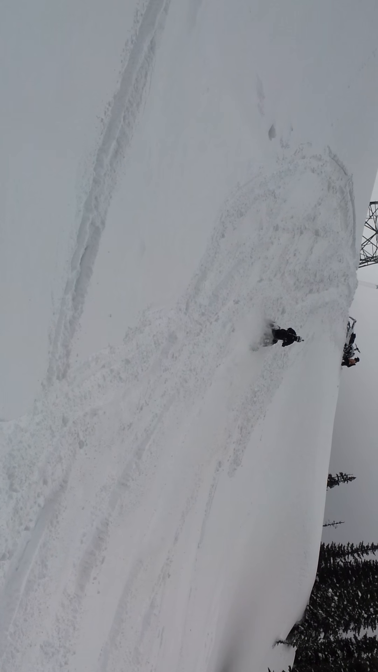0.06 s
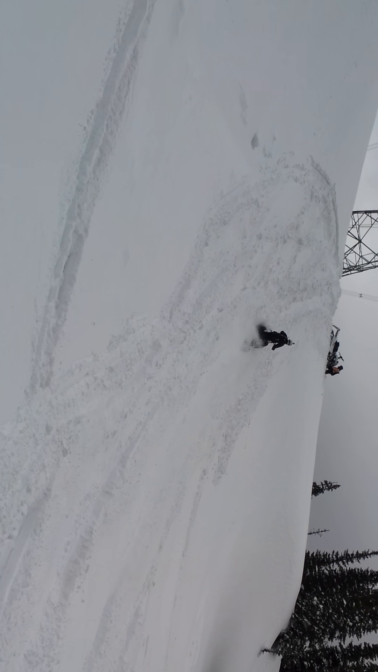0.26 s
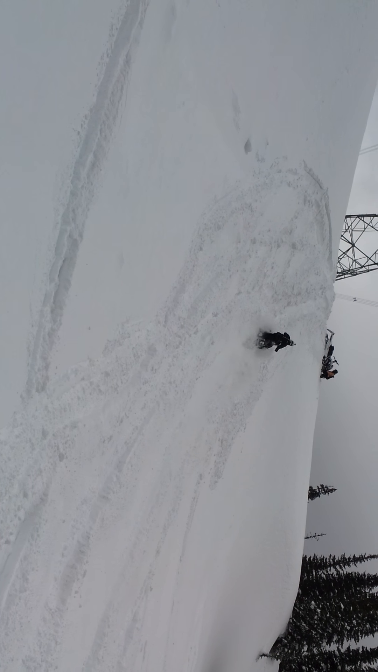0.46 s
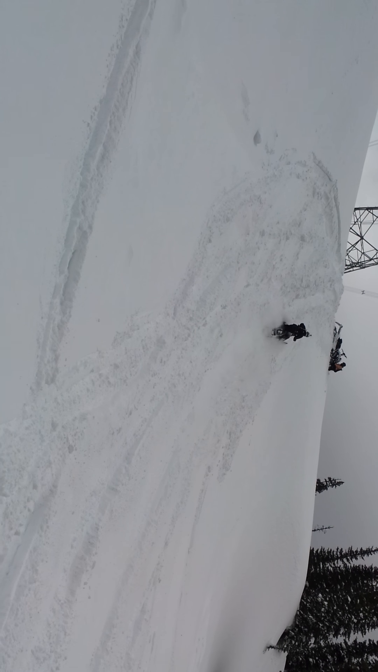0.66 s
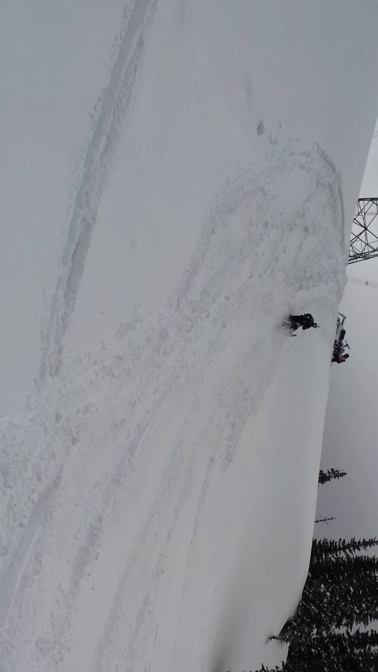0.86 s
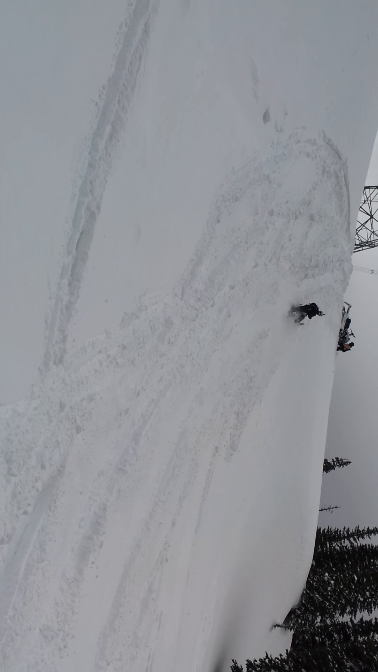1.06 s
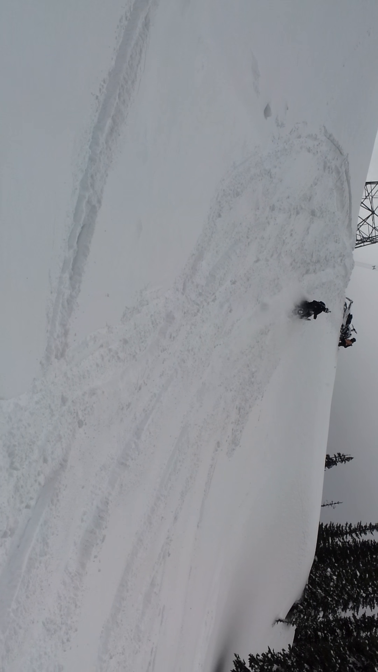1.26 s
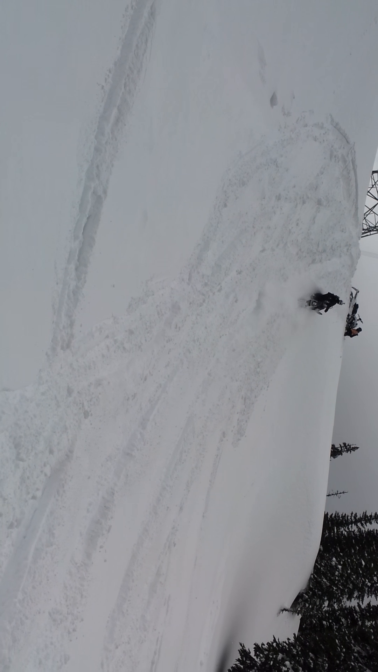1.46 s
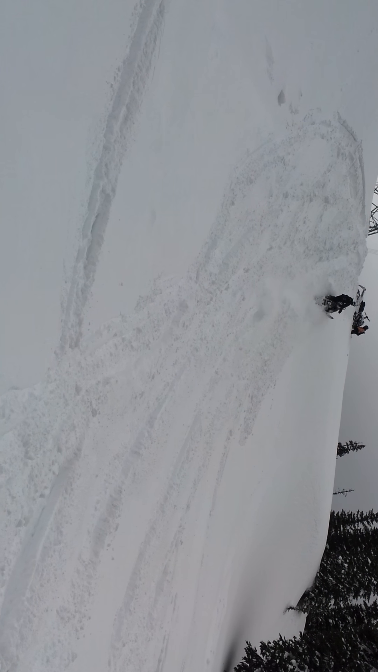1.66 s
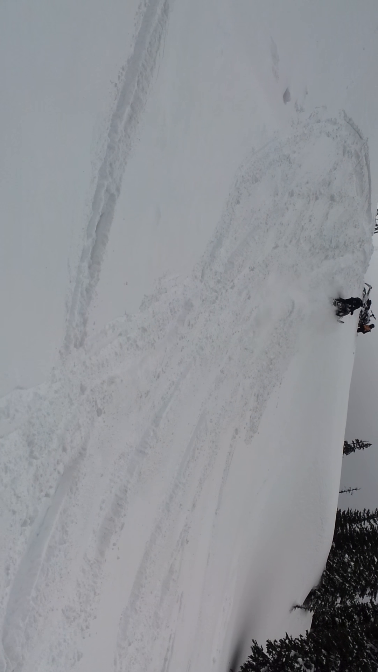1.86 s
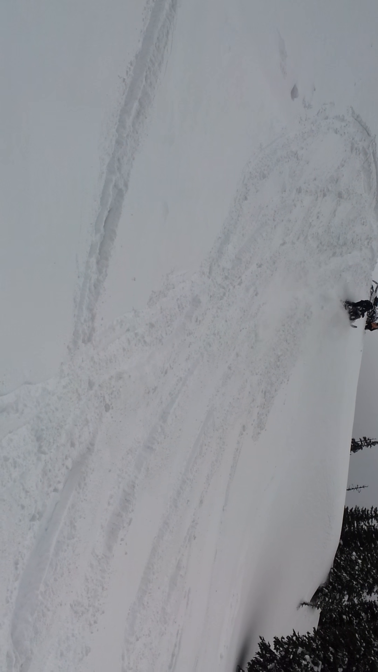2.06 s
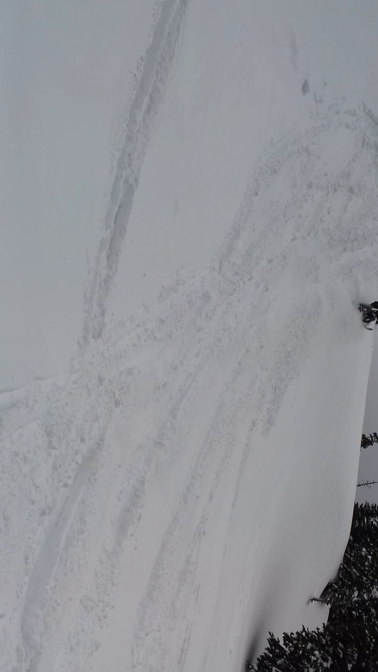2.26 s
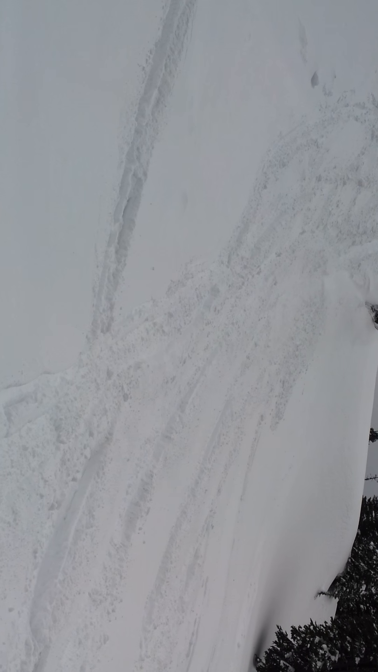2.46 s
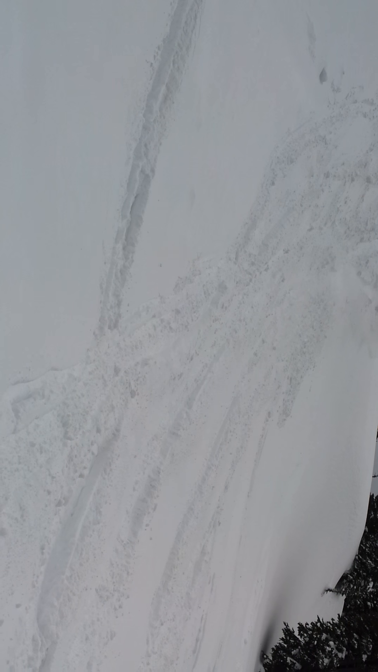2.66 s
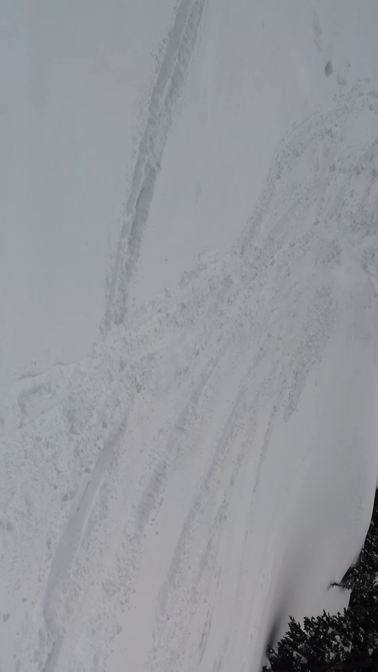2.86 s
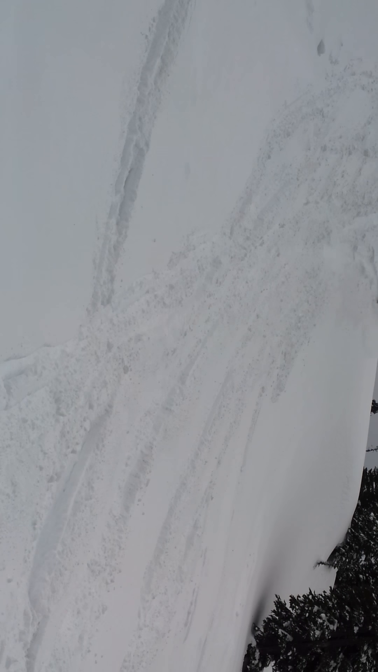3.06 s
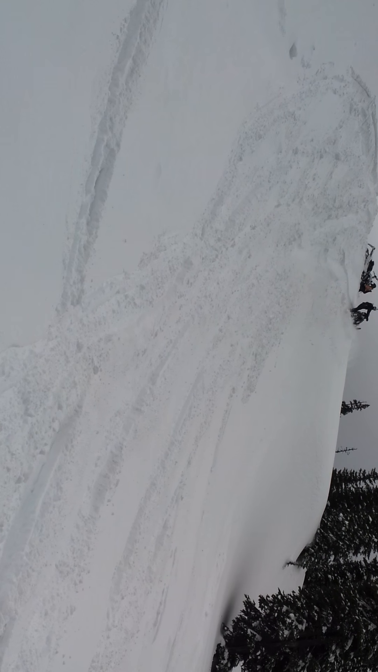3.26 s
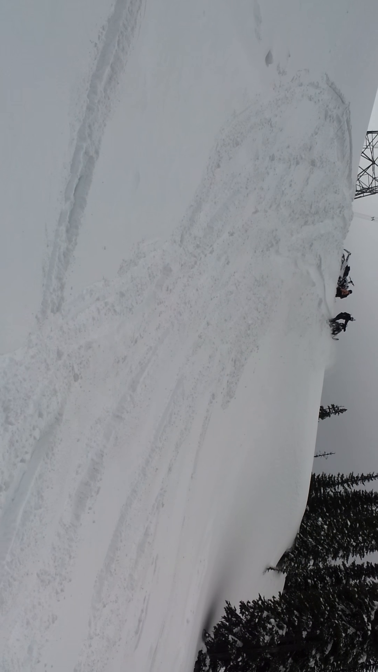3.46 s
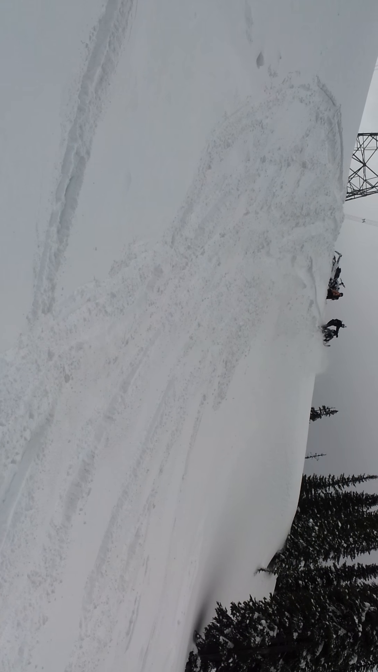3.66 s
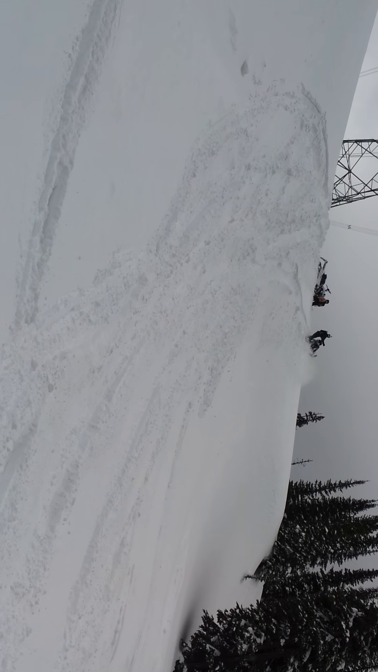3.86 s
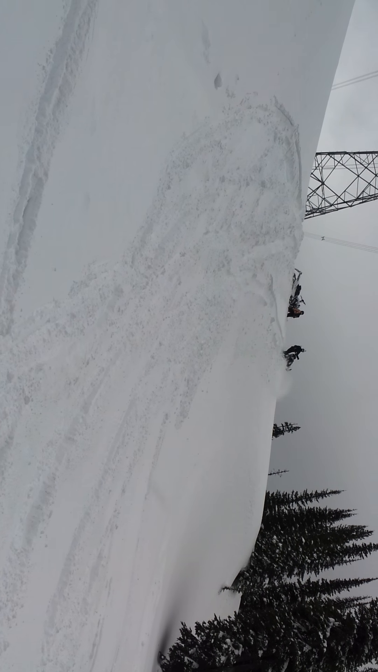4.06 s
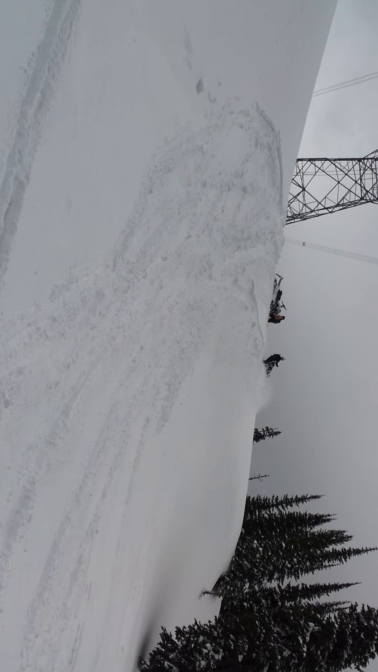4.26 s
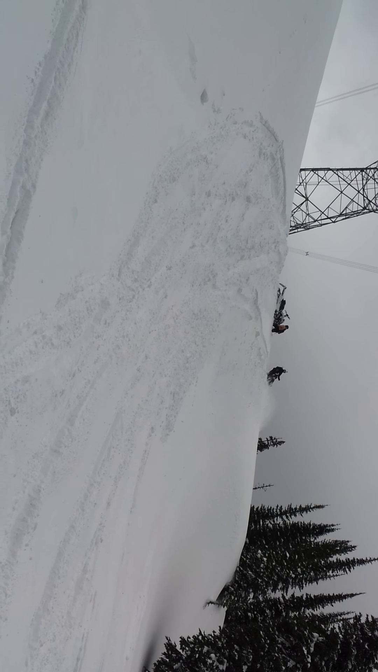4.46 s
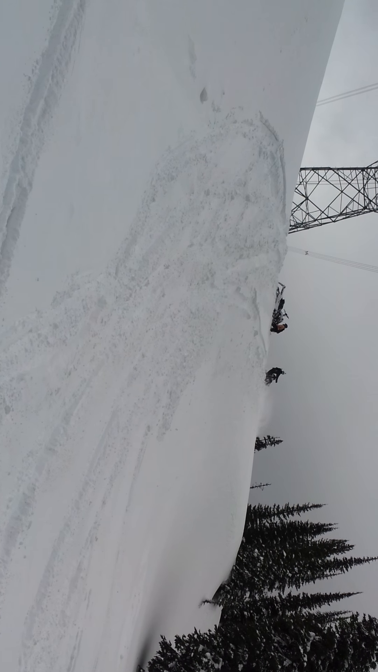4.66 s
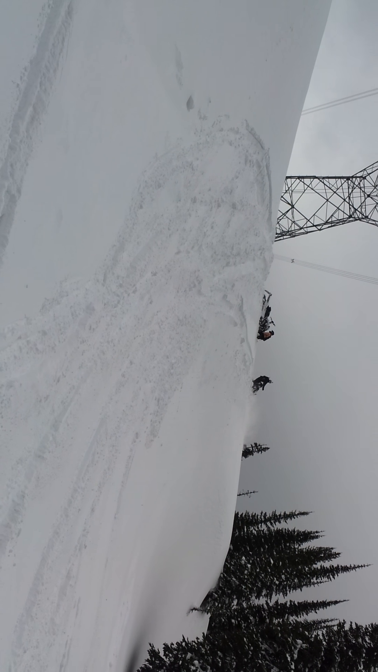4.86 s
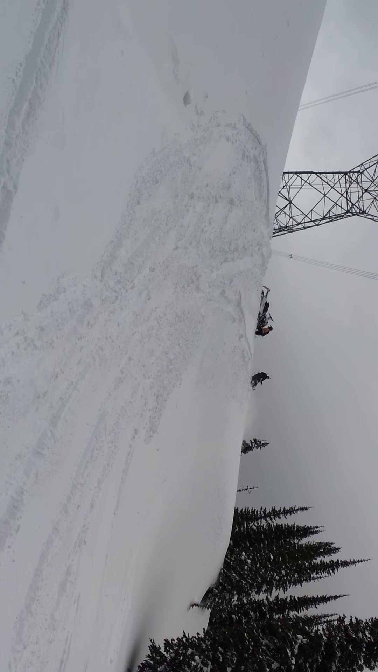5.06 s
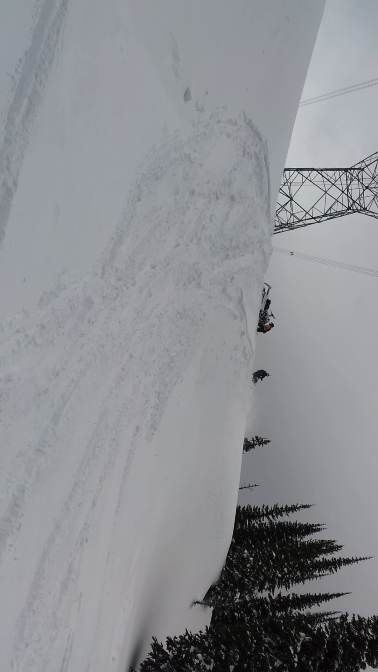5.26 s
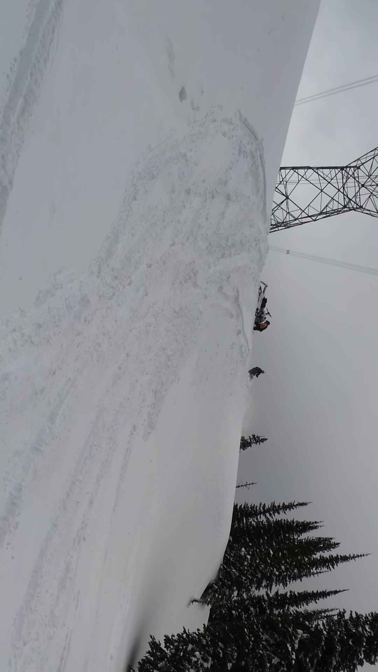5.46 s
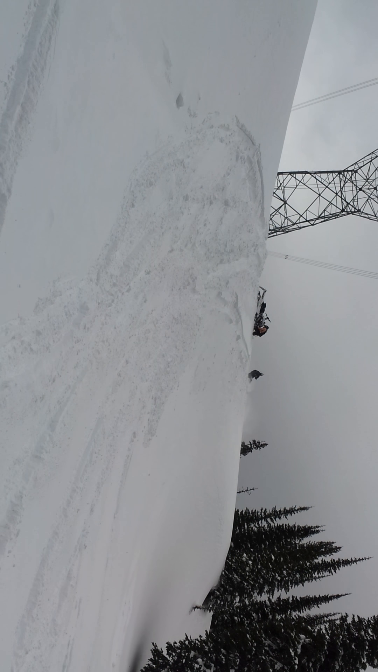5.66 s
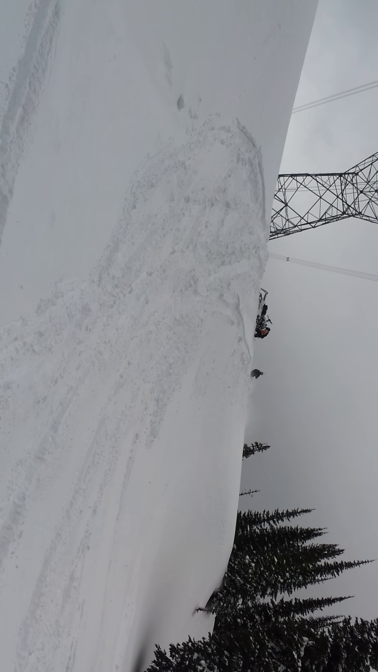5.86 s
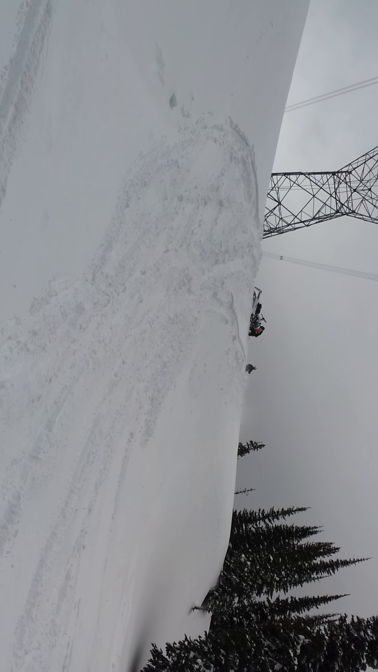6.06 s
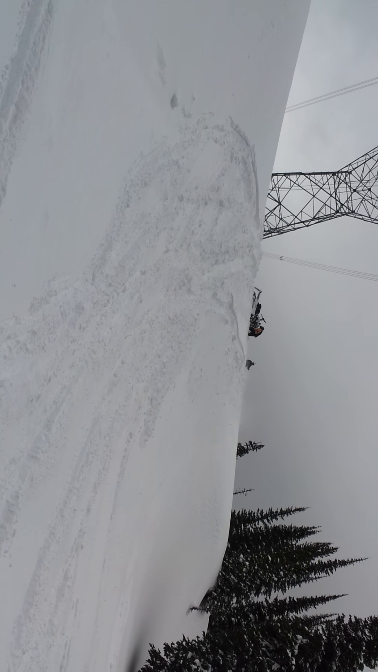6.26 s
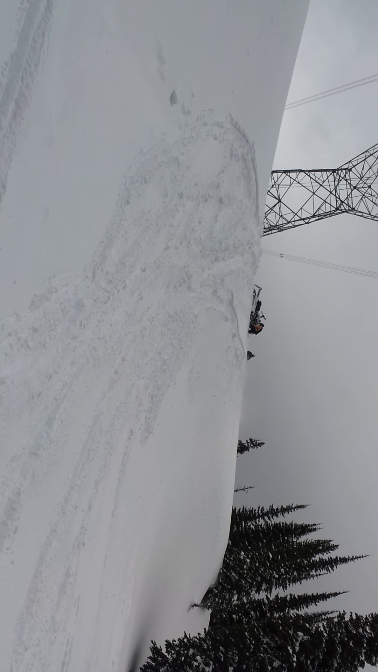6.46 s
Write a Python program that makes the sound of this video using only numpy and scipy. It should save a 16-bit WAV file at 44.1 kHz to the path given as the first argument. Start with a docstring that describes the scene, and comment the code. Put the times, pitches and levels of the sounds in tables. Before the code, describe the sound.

High-revving snowmobile engine howls and rasps in uneven bursts, churning snow, then sinks away to a faint echoing drone beside a lumpy idle.

```python
"""A two-stroke twin snowmobile climbs a snowy hillside in surges of throttle and draws away over the crest.
Its exhaust is a stack of tones locked to the firings, with rasp and roaring gas; it gets brighter as it pulls.
The track hums and churns snow, made from a wavering tone and shaped noise, and the slope sends back an echo.
Another sled idles close by on uneven pulses, and wind noise with short thumps bumps the microphone."""
import sys
import numpy as np
from scipy import signal
from scipy.fft import rfft, irfft, next_fast_len
from scipy.io import wavfile
from scipy.ndimage import uniform_filter1d, map_coordinates

SR = 44100
rng = np.random.default_rng(int(sys.argv[2]) if len(sys.argv) > 2 else 0)


def output_pcm(signal):
    """Save a mono or channel-first signal as 16-bit PCM at the path in sys.argv[1].

    Samples are clipped to [-1, 1] before scaling.
    """
    pcm = np.clip(np.atleast_2d(signal).T, -1, 1) * 32767
    wavfile.write(sys.argv[1], SR, np.round(pcm).astype(np.int16))


N = 287532  # length of the sound in samples

CRUISE_HZ = 250  # the firing rate about which the revs swing
HIDDEN_S = 4.6  # from here on the sled sinks out of sight behind the crest

# how often the engine fires: (t/s, f/Hz)
FIRING_RATE = [(0.0, 250.7), (0.39, 255.1), (0.54, 247.9), (0.77, 246.3), (0.87, 251.6), (0.96, 259.9),
               (1.02, 263.6), (1.07, 269.4), (1.15, 259.4), (1.29, 235.2), (1.41, 230.4), (1.49, 229.6),
               (1.55, 234.1), (1.61, 236.3), (1.7, 243.1), (1.75, 248.2), (1.84, 259.0), (1.93, 268.4),
               (2.08, 267.6), (2.2, 264.8), (2.77, 269.7), (2.98, 268.4), (3.09, 262.6), (3.26, 249.3),
               (3.39, 243.2), (3.84, 240.2), (4.53, 250.4), (4.75, 235.6), (4.93, 234.7), (5.22, 255.0),
               (5.41, 261.8), (5.71, 248.3), (5.81, 251.0), (5.86, 246.9), (6.24, 248.2), (6.51, 239.0)]
FLYWHEEL_S = 0.09  # the flywheel rounds every turn of the revs over this time


def firing_rate():
    """The engine's firings a second; the heavy flywheel keeps them from changing abruptly."""
    return uniform_filter1d(curves(FIRING_RATE)[0], int(FLYWHEEL_S * SR), mode="nearest")


# how hard the engine pulls, as heard from below: (t/s, level/dB)
PULL = [(0.0, -19.5), (.25, -22), (.5, -28.5), (.8, -21), (1.1, -13.5), (1.48, -26.5), (1.9, -16),
        (2.28, -22), (2.6, -12.5), (2.9, -13), (3.33, -25), (3.8, -22), (4.35, -19.5), (4.75, -29),
        (5.35, -30.5), (5.8, -32), (6.52, -41.5)]


def engine_effort():
    """Swings of the engine's pull about its mean, in dB; they drive the layers of the sled."""
    pull_db, = curves(PULL)
    return pull_db - pull_db.mean()


# weak tones halfway between the upper harmonics, from unequal cylinders: (multiple of the firing rate)
HALFWAY_ORDERS = [4.5, 5.5, 6.5, 7.5, 8.5, 9.5, 10.5]
# strength of the weak tones against the leading tones beside them: (f/Hz, level/dB)
HALFWAY_STRENGTH = [(1050, -10), (1200, -10), (1400, -20), (1700, -16), (2000, -15), (2300, -14),
                    (2900, -20)]
FLUTTER_DB, FLUTTER_DB_PER_S = 1, 1  # flutter in the moving air, and its gain per second hidden
BURN_DB = 0.7  # how much the strength varies from blast to blast


def exhaust(cycles, firing_hz, effort_db):
    """Leading and weak engine orders add up to one sharp, ringing blast per firing."""
    orders, levels = leading_levels(firing_hz, effort_db)
    flutter_db = FLUTTER_DB + FLUTTER_DB_PER_S * hidden_for()
    blasts = sum(amp(db) * tone(cycles, order, flutter_db) for order, db in zip(orders, levels))
    for order in HALFWAY_ORDERS:
        place = np.interp(order, orders, np.arange(len(orders)))
        beside_db = (levels[int(place)] + levels[int(np.ceil(place))]) / 2
        # the pipe's colour stays put while the orders glide through it
        weak_db = beside_db + along(HALFWAY_STRENGTH, order * firing_hz)
        blasts += amp(weak_db) * tone(cycles, order, 1.5 * flutter_db)
    # no two charges burn alike, so each blast has its own strength
    burn = np.interp(cycles, np.arange(4096), rng.standard_normal(4096))
    return blasts * amp(BURN_DB * burn - 4.0)


# The levels below are those inside the exhaust's mix, before its overall cut.
# low drone, the firing tone and its octave: (t/s, firing tone level/dB, octave level/dB)
DRONE_LEVELS = [(0.0, -34.5, -18), (0.16, -18, -26), (0.23, -33.5, -30), (0.76, -25, -16.5),
                (1.07, -24.5, -17), (1.16, -25, -24), (1.3, -27.5, -15.5), (1.45, -22.5, -25.5),
                (1.72, -28.5, -16.5), (1.85, -24.5, -31.5), (2.12, -19.5, -25.5), (2.289, -23, -28.5),
                (2.98, -15.5, -36.5), (3.11, -21.5, -32), (3.19, -37.5, -28), (3.74, -33, -27),
                (4.41, -28, -39), (4.47, -22.5, -54), (4.59, -31, -37.5), (6.52, -50, -34)]
# growl, the crank's third order, halfway between the firing tone and its octave: (t/s, level/dB)
GROWL_LEVEL = [(0, -37.5), (.3, -26.5), (1.101, -51.5), (1.351, -27), (1.65, -22.5), (1.85, -39),
               (2.1, -26), (3.0, -28), (3.298, -42.5), (5.0, -43), (5.601, -71), (6.52, -39.5)]
# body of the note, the 3rd harmonic: (t/s, level/dB)
BODY_LEVEL = [(0.0, -22.5), (0.31, -32), (1.09, -24.5), (1.14, -28.9), (1.95, -29), (2.17, -46),
              (2.29, -30), (2.45, -48.5), (2.51, -35.6), (2.71, -21), (3.15, -32.5), (3.89, -23.5),
              (4.5, -37), (4.66, -30.0), (5.15, -42.5), (5.31, -29.5), (5.519, -38.5), (6.51, -40)]
# howl, the 5th harmonic on the pipe's main resonance: (t/s, level/dB)
HOWL_LEVEL = [(0.0, -8.5), (0.25, -14), (0.33, -37), (0.559, -31.5), (0.831, -16.5), (1.032, -32),
              (1.2, -17.5), (1.29, -27.5), (1.709, -24.5), (1.781, -15), (2.32, -34), (2.542, -17),
              (3.179, -27), (3.32, -31), (4.191, -14.5), (4.561, -20.5), (5.031, -35), (5.06, -27.5),
              (5.229, -23), (6.17, -39), (6.3, -34), (6.52, -38.5)]
# blare, the 6th harmonic on the pipe's next resonance: (t/s, level/dB)
BLARE_LEVEL = [(0, -16.5), (.25, -25.5), (.45, -47.5), (.75, -29.5), (1.08, -19), (1.352, -25.5),
               (1.6, -24.5), (1.999, -25), (2.35, -25.5), (2.85, -15), (3.15, -19.5), (3.35, -34),
               (3.7, -24), (4.099, -26.5), (4.45, -18.5), (4.749, -37.5), (5.4, -32), (5.75, -40),
               (6.52, -49)]
# snarl, the 7th harmonic: (t/s, level/dB)
SNARL_LEVEL = [(0.0, -27.5), (0.49, -36), (0.71, -37.5), (0.77, -28), (1.08, -37.5), (1.13, -24),
               (1.42, -38.5), (1.92, -23.5), (2.23, -27), (2.31, -44.5), (3.04, -32), (3.28, -44.6),
               (3.35, -49), (3.56, -33.5), (4.99, -33.5), (5.55, -40), (5.71, -50.5), (6.51, -42)]
# whine, the 8th harmonic on the pipe's upper resonance: (t/s, level/dB)
WHINE_LEVEL = [(0, -24.5), (.45, -45.5), (0.749, -33.5), (1.15, -23), (1.399, -35), (1.899, -30.5),
               (2.099, -39), (2.351, -35.5), (2.55, -24.5), (2.951, -17.5), (3.3, -32), (3.8, -24),
               (4.3, -33.5), (4.75, -38), (5.35, -34.5), (5.699, -48.5), (6.52, -56)]
# buzz, the 9th harmonic: (t/s, level/dB)
BUZZ_LEVEL = [(0.0, -33.5), (0.17, -56), (0.25, -31), (0.83, -48), (1.14, -32), (1.32, -55.5), (1.9, -28.5),
              (1.96, -43), (2.57, -40.5), (3.02, -44), (3.14, -33), (3.29, -65), (4.01, -33), (4.5, -30.5),
              (4.75, -58), (5.35, -35.5), (5.97, -57.5), (6.51, -61)]
# other leading tones, which change as the sled climbs and turns: (multiple of the firing rate,
# level/dB at the start and mean effort, dB per dB of effort, dB per Hz of revs above cruise, dB gained a second)
OTHER_LEADING = [(2.5, -42.5, 0.7, -0.55, -1), (3.5, -31, 0.2, 0.35, -3), (4, -29.6, 0.65, 0.21, -1)]
SWAY_DB = 1.3  # each of the other tones swells and sinks slowly on its own


def leading_levels(firing_hz, effort_db):
    """Multiples and dB of the leading tones: most have their own curves, the rest follow effort and revs."""
    tables = [DRONE_LEVELS, GROWL_LEVEL, BODY_LEVEL, HOWL_LEVEL,
              BLARE_LEVEL, SNARL_LEVEL, WHINE_LEVEL, BUZZ_LEVEL]
    level_curves = [db for table in tables for db in curves(table)]
    levels = dict(zip([1, 2, 1.5, 3, 5, 6, 7, 8, 9], level_curves))
    for order, db, share, db_per_hz, db_per_s in OTHER_LEADING:
        engine_db = db + share * effort_db + db_per_hz * (firing_hz - CRUISE_HZ)
        levels[order] = engine_db + db_per_s * seconds() + SWAY_DB * wobble(10)
    orders = sorted(levels)
    return orders, [levels[order] for order in orders]


# exhaust resonances: (f/Hz, width/Hz)
PIPE_RESONANCES = [(600, 300), (1260, 170), (1560, 270), (2150, 320), (2900, 500)]
DRIFT_RAD, DRIFT_RAD_PER_S = 0.16, 0.13  # slow phase drift, and its gain per second hidden for order 1
SHAKE_RAD, SHAKES_PER_S = 0.034, 110  # quick shaking by uneven burning: angle per order, and its rate


def tone(cycles, order, flutter_db):
    """One engine order of rms near 1, a little rough and fluttering in the moving air."""
    hz = order * CRUISE_HZ
    # the pipe's resonances ring on after each firing and so delay the orders near them
    lag = sum(np.arctan(2 * (hz - centre) / width) for centre, width in PIPE_RESONANCES)
    # the cylinders differ more in timing than in strength, which sets the halfway tones a quarter turn off
    lag += np.pi * (order % 1)
    # high tones drift most once the sled is hidden
    drift = (DRIFT_RAD + DRIFT_RAD_PER_S * hidden_for() * np.sqrt(order)) * wobble(24)
    shake = SHAKE_RAD * order * wobble(SHAKES_PER_S)
    flutter = amp(flutter_db * wobble(22))
    return np.sqrt(2) * flutter * np.cos(2 * np.pi * order * cycles - lag + drift + shake)


# overall level of the raspy edge, before its two parts are balanced: (t/s, level/dB)
EDGE_LEVEL = [(0.0, -36.5), (0.51, -41.5), (0.98, -33), (1.5, -41.5), (1.91, -34), (1.94, -37), (2.4, -40),
              (2.54, -32), (3.14, -32), (3.36, -46), (3.76, -35), (4.45, -33.5), (4.7, -44.5),
              (5.36, -40.5), (5.85, -48.5), (6.52, -48)]
# spectrum of the edge's tones: (f/Hz, relative level/dB)
RASP_SPECTRUM = [(2300, -1), (2500, -2), (2700, -9.5), (3000, -11.5), (3400, -17), (3800, -20.5),
                 (4300, -32)]
# spectrum of the edge's rushing gas: (f/Hz, relative level/dB)
RUSH_SPECTRUM = [(1700, -29.5), (2200, 13.5), (2500, 8), (2900, 6), (3400, -26), (4000, -7.5), (5000, -60)]
RASP_TONES_DB, RASP_GAS_DB = -5, -7  # balance of the edge's tones and gas
RASP_SWAY_DB, RASP_FLUTTER_DB = 2.5, 3.5  # slow and quick wavering of each tone
RASP_LOAD = 0.09  # dB lost per order above the 10th and per dB of effort below full load
SHADE_DB_PER_S = 4  # the crest shades the tones by this much for each second hidden


def rasp(cycles, firing_hz, effort_db):
    """The highest orders and the gas rushing out with them give the note its edge; the crest shades the tones."""
    edge_db, = curves(EDGE_LEVEL)
    tones = 0
    for order in range(10, 17):
        # the very top orders come out only under full load
        load_db = RASP_LOAD * (order - 10) * (effort_db - effort_db.max())
        db = along(RASP_SPECTRUM, order * firing_hz) + load_db + RASP_SWAY_DB * wobble(8.4)
        tones += amp(db) * tone(cycles, order, RASP_FLUTTER_DB)
    gas = coloured(puffs(cycles, depth=0.45), RUSH_SPECTRUM)
    shaded_tones = amp(RASP_TONES_DB - SHADE_DB_PER_S * hidden_for()) * tones
    return amp(edge_db) * (shaded_tones + amp(RASP_GAS_DB) * gas)


# gas roaring in the pipe: (level/dB at the start and mean effort, dB per dB of effort, dB lost a second)
ROAR_RULE = (-41, 1.15, 0.45)


def roar(cycles, effort_db):
    """Turbulent gas rings the pipe, louder the harder the engine pulls."""
    gas = unit(resonate(puffs(cycles, depth=0.4), centre_hz=1620, width_hz=360))
    return driven(ROAR_RULE, effort_db) * gas


# the track's hum: (level/dB at the start and mean effort, dB per dB of effort, dB lost a second)
HUM_RULE = (-33.5, 0.14, 0.98)


def track_hum(cycles, effort_db):
    """The lugs strike the snow a little slower than the engine fires, so the two tones beat."""
    lugs = amp(2.5 * wobble(4)) * np.sin(2 * np.pi * 0.955 * cycles + 0.6 * wobble(7))
    return driven(HUM_RULE, effort_db) * lugs


# churned snow: (level/dB at the start and mean effort, dB per dB of effort, dB lost a second)
CHURN_RULE = (-28.3, 0.45, 1.95)
# spectrum of the churned snow: (f/Hz, relative level/dB)
CHURN_SPECTRUM = [(170, -20), (215, -13.5), (245, -14), (290, 0), (450, -1), (650, -4.5), (1000, -1.5),
                  (1400, -3.5), (1900, -6), (2300, -8.5), (2900, -24), (4000, -80)]


def snow_churn(cycles, effort_db):
    """The track throws up snow: shaped noise that pulses faintly with the firings."""
    return driven(CHURN_RULE, effort_db) * coloured(puffs(cycles, depth=0.034), CHURN_SPECTRUM)


# level of the hissing treble, about which it wavers: (t/s, level/dB)
TREBLE_LEVEL = [(0.0, -45), (0.63, -47.5), (1.09, -39.5), (1.32, -51), (1.71, -50.5), (1.87, -45),
                (2.29, -48.5), (2.91, -40), (3.4, -52), (4.34, -48), (4.68, -57), (5.19, -57), (6.25, -62),
                (6.52, -62)]
# spectrum of the hiss: (f/Hz, relative level/dB)
HISS_SPECTRUM = [(2000, -39.5), (3000, 3), (3600, -2), (4300, -10), (5300, 0.5), (6000, 2.5), (6900, -4.5),
                 (7500, -16), (8000, -45)]


def gas_hiss(cycles):
    """Exhaust gas hisses in the treble and pulses with the firings."""
    level_db = curves(TREBLE_LEVEL)[0] + 1.7 * wobble(8.3)
    return amp(level_db) * coloured(puffs(cycles, depth=0.17), HISS_SPECTRUM)


# how long the slope's answer takes to fade by 60 dB; the answer is cut off after about a second: (f/Hz, t/s)
SLOPE_FADE = [(200, 8.7), (1500, 8.1), (7000, 0.037)]


def slope(x):
    """Snow and trees scatter a soft, late answer: fading noise that starts 20 ms after the sound."""
    hz, t, z = signal.stft(rng.standard_normal(SR), SR, nperseg=256)
    fade = amp(-60 * t / along(SLOPE_FADE, hz)[:, None])
    tail = signal.istft(z * fade, SR, nperseg=256)[1]
    return signal.fftconvolve(np.pad(x, (SR // 50, 0)), tail / np.linalg.norm(tail))[:N]


ECHO_DB, ECHO_DB_PER_S = -22, 6  # the slope's answer against the direct sound, and its gain per second hidden
FLICKER_DB_PER_S, FLICKERS_PER_S = 0.6, 19  # depth gained for each second hidden, and rate


def over_the_crest(sled):
    """The slope's share grows as the sled hides, and air swirling over the crest makes the sound flicker."""
    echo = amp(ECHO_DB + ECHO_DB_PER_S * hidden_for())
    flicker = amp(FLICKER_DB_PER_S * hidden_for() * wobble(FLICKERS_PER_S))
    return flicker * (sled + echo * slope(sled)) / np.hypot(1, echo)


def hidden_for():
    """Seconds since the sled began to sink behind the crest."""
    return np.maximum(seconds() - HIDDEN_S, 0)


# spectrum of the idling sled's pulses: (f/Hz, relative level/dB)
IDLE_SPECTRUM = [(20, -31.5), (40, -33), (55, 7), (67, -1.5), (80, 24), (90, 12.5), (112, 18.5), (134, 3),
                 (160, -3.5), (200, -17.5), (300, -33.5), (700, -45.5), (2000, -65.5)]
IDLE_HZ = 66.9  # mean firings a second
IDLE_PULSES_DB, IDLE_THROB_DB = -32.5, -34.5


def idler():
    """A three-cylinder sled idles unevenly nearby: its firing tone lopes under lumpy pulses from a deep silencer."""
    cycles = np.cumsum(IDLE_HZ * (1 + 0.0045 * wobble(3.3))) / SR
    pulses = firings(cycles + 0.1 * wobble(9), [2.5, -1.5, -3.5], scatter_db=2.2, jitter=0.065)
    # the lope comes round about once in six firings
    lope = 1 + 0.45 * np.sin(2 * np.pi * cycles / 6 + 1.1 * wobble(5))
    throb = np.sqrt(2) * lope * np.cos(2 * np.pi * cycles)
    return amp(IDLE_PULSES_DB) * coloured(pulses, IDLE_SPECTRUM) + amp(IDLE_THROB_DB) * throb


# spectrum of the wind's rumble: (f/Hz, relative level/dB)
WIND_SPECTRUM = [(20, -60.5), (35, -36.5), (55, 2), (90, 1), (150, -2.5), (220, -6.5), (350, -15.5),
                 (800, -55)]
# gusts; the length is from the peak to 1/e: (t/s, peak level/dB, length/s, thump f/Hz)
GUST_TIMES = [(.255, -28, .03, 120), (.31, -19, .016, 110), (.45, -26, .022, 75), (.55, -24, .014, 160),
              (.585, -23, .018, 80), (.64, -29, .012, 150), (.972, -24, .012, 130), (4.0, -26, .02, 105),
              (4.18, -21, .008, 130), (4.465, -29, .018, 130), (5.16, -31, .02, 140),
              (5.79, -32, .018, 120), (6.25, -35, .015, 135)]
# steady wind: its level, how much stronger it starts, and the time in seconds over which that dies down
BREEZE_DB, BREEZE_START_DB, BREEZE_CALMS_S = -37.5, 11.5, 0.84
GUST_RUMBLE_DB = -1.5  # a gust's rumble against its thump


def wind():
    """A dying breeze rumbles on the microphone; each short gust gives it a low thump and a puff of rumble."""
    t = seconds()
    breeze_db = BREEZE_DB + BREEZE_START_DB * np.exp(-t / BREEZE_CALMS_S)
    rumble = coloured(rng.standard_normal(N), WIND_SPECTRUM)
    air = amp(breeze_db) * rumble
    for start, db, length, hz in GUST_TIMES:
        swell = np.exp(-((t - start) / length) ** 2)
        thump = np.sqrt(2) * np.cos(2 * np.pi * hz * (t - start))
        air += amp(db) * swell * (thump + amp(GUST_RUMBLE_DB) * rumble)
    return air


def puffs(cycles, depth):
    """Gas noise that bursts once per firing."""
    return unit(rng.standard_normal(N) * np.exp(depth * np.cos(2 * np.pi * (cycles - 0.1))))


def firings(cycles, cylinder_db, scatter_db, jitter):
    """One pulse per whole cycle, sized by its cylinder, scattered in size and timing (jitter in cycles)."""
    count = np.arange(1, int(cycles[-1]))
    chance = rng.standard_normal((4096, 2))[:len(count)]
    at = np.interp(count + jitter * chance[:, 0], cycles, np.arange(N))
    size = amp(np.array(cylinder_db)[count % len(cylinder_db)] + scatter_db * chance[:, 1])
    # a short windowed sinc places each pulse between samples
    taps = at.astype(int)[:, None] + np.arange(-7, 9)
    offset = taps - at[:, None]
    shape = np.sinc(offset) * np.sinc(offset / 8)
    return np.bincount(np.clip(taps, 0, N - 1).ravel(), (size[:, None] * shape).ravel(), N)


def driven(rule, effort_db):
    """Gain of a layer that swells with the effort and fades as the sled draws away."""
    db, share, fade_db_per_s = rule
    return amp(db + share * effort_db - fade_db_per_s * seconds())


def resonate(x, centre_hz, width_hz):
    """x through two like resonances in a row."""
    def response(hz):
        damping = 1j * hz * width_hz
        return (damping / (centre_hz ** 2 - hz * hz + damping)) ** 2
    return filtered(x, response)


def coloured(x, spectrum):
    """x filtered by the given (f/Hz, level/dB) curve, at rms 1."""
    return unit(filtered(x, lambda hz: amp(along(spectrum, hz))))


def filtered(x, response):
    """x times a complex response of frequency."""
    m = next_fast_len(N + SR // 2)
    return irfft(rfft(x, m) * response(np.fft.rfftfreq(m, 1 / SR)), m)[:N]


def wobble(rate):
    """A smooth random curve, rate knots a second."""
    coarse = np.arange(0, N + 32, 32)
    knots = rng.standard_normal(4096)
    return np.interp(np.arange(N), coarse, map_coordinates(knots, [coarse * rate / SR], mode="wrap"))


def curves(rows):
    """One value per sample for each column after the time."""
    times, *columns = np.transpose(rows)
    return [np.interp(seconds(), times, column) for column in columns]


def along(points, hz):
    """(f/Hz, value) points read on a log axis."""
    f, values = np.transpose(points)
    return np.interp(np.log(hz + 1), np.log(f + 1), values)


def seconds():
    """The time of each sample."""
    return np.arange(N) / SR


def amp(db):
    """Decibels to gain."""
    return 10 ** (np.asarray(db) / 20)


def unit(x):
    """x at rms 1."""
    return x / np.sqrt(np.mean(x ** 2) + 1e-20)


def scene():
    """The climbing sled and its echo, the idling one, and the wind."""
    firing_hz = firing_rate()
    effort_db = engine_effort()
    # engine phase: one cycle per firing, with a tiny unsteadiness
    cycles = np.cumsum(firing_hz * (1 + 0.00038 * wobble(25))) / SR
    engine = exhaust(cycles, firing_hz, effort_db) + rasp(cycles, firing_hz, effort_db) + roar(cycles, effort_db)
    track = track_hum(cycles, effort_db) + snow_churn(cycles, effort_db)
    sled = engine + track + gas_hiss(cycles)
    return (over_the_crest(sled) + idler() + wind())[None]


LOW_CUT_HZ, TOP_HZ = 38, 7900  # bass corner and upper band limit


def record(dry):
    """The microphone's path cuts the deepest bass and keeps nothing above its band limit."""
    def response(hz):
        low_cut = 1 / np.sqrt(1 + (LOW_CUT_HZ / (hz + 1)) ** 12)
        return low_cut * (hz < TOP_HZ)
    return filtered(dry[0], response)[None]


dry = scene()
out = record(dry)
output_pcm(out)
```